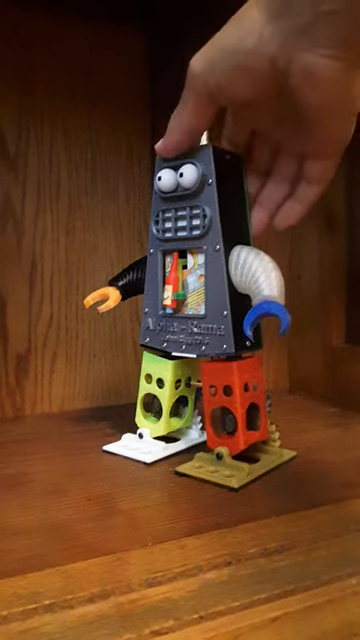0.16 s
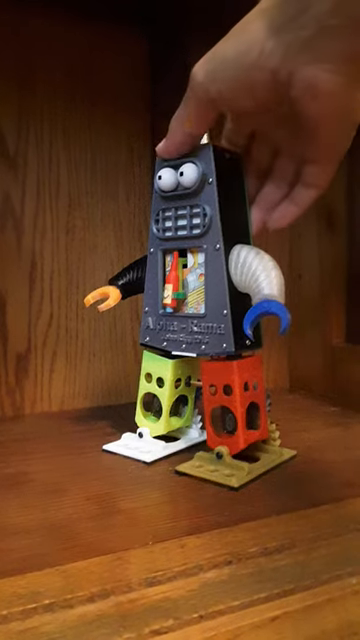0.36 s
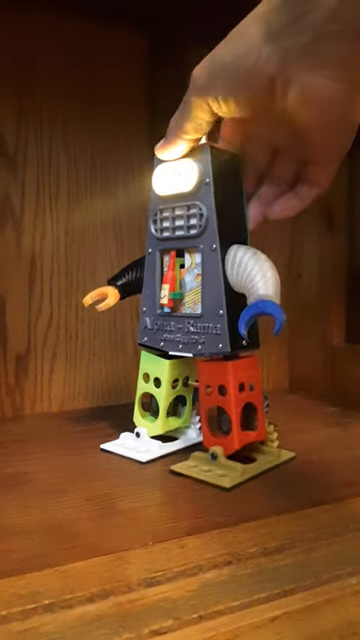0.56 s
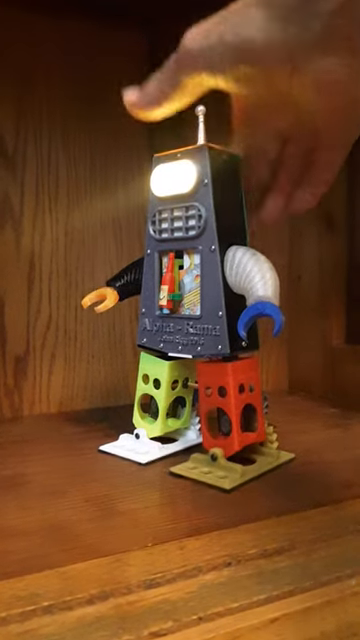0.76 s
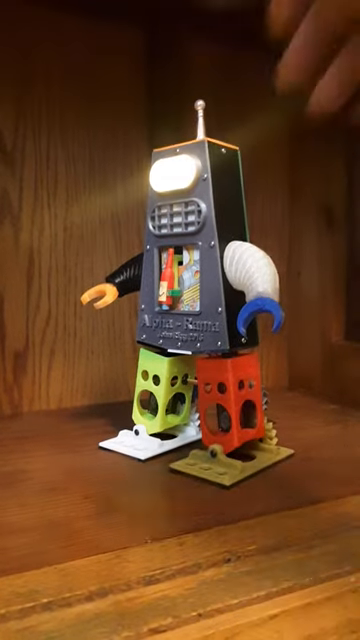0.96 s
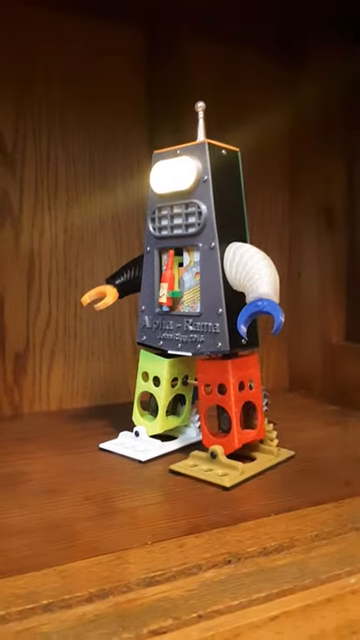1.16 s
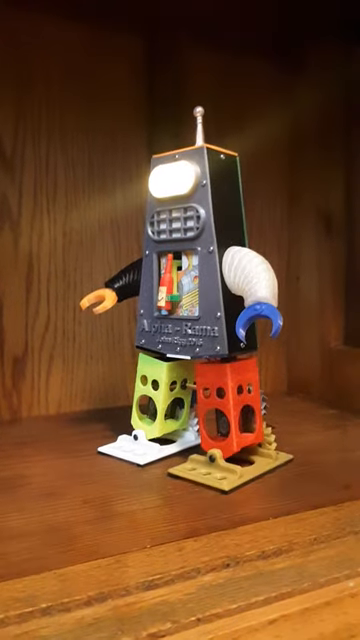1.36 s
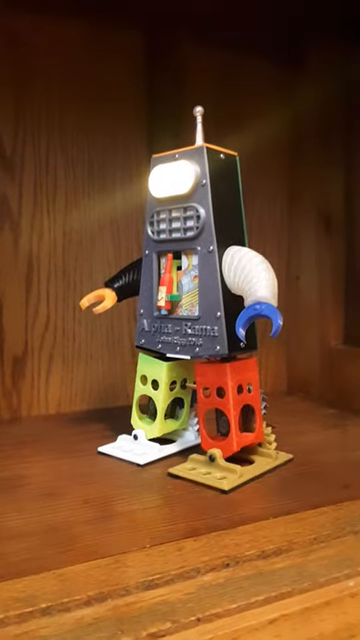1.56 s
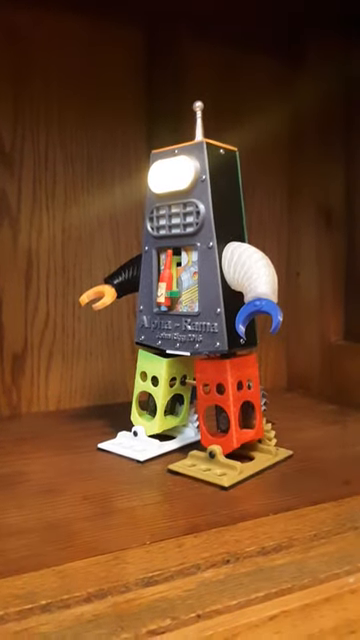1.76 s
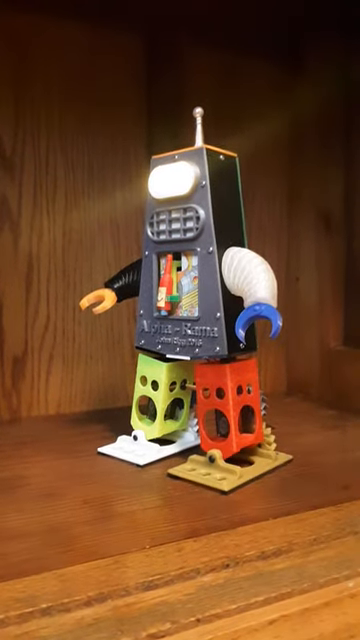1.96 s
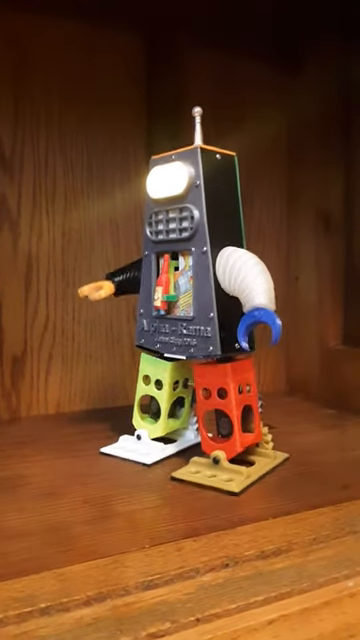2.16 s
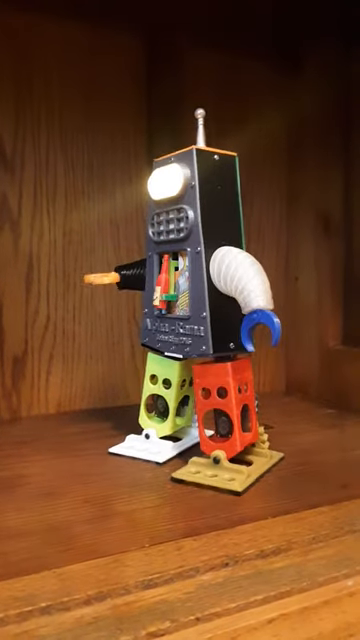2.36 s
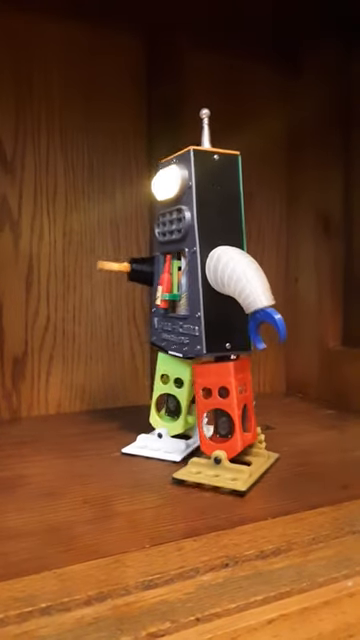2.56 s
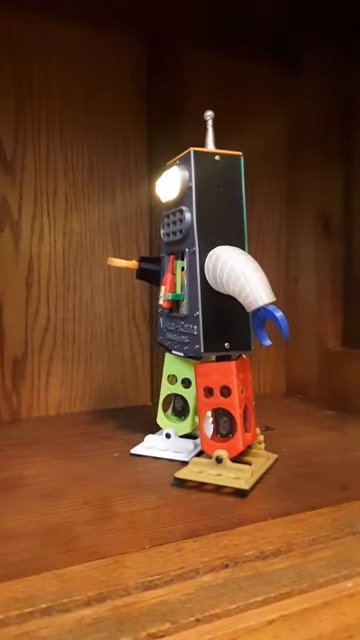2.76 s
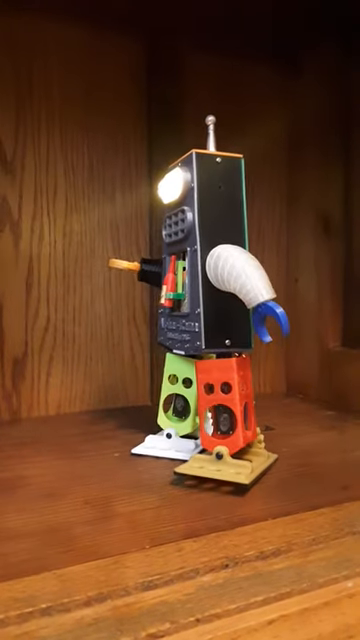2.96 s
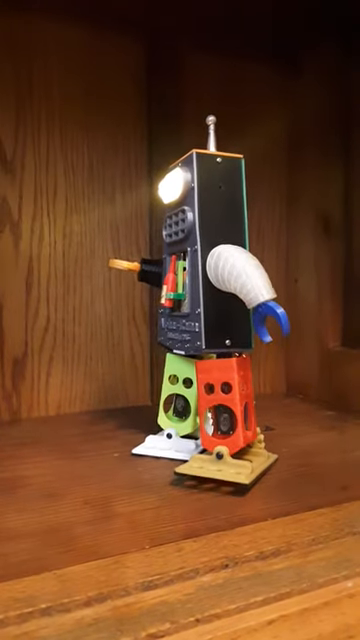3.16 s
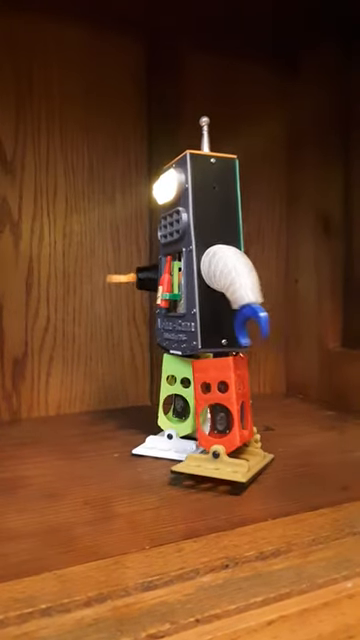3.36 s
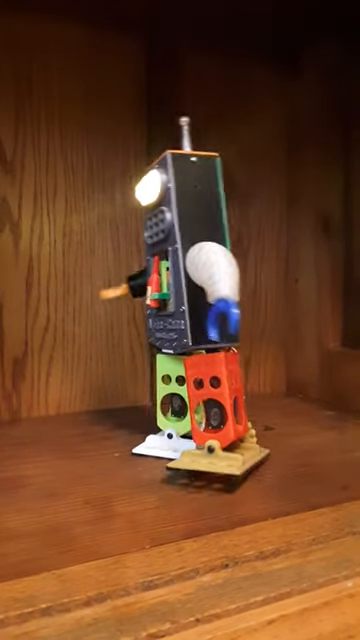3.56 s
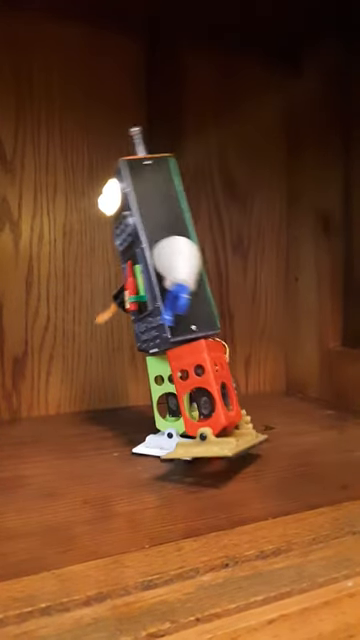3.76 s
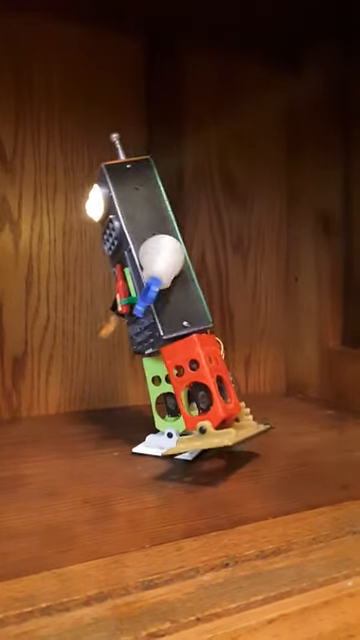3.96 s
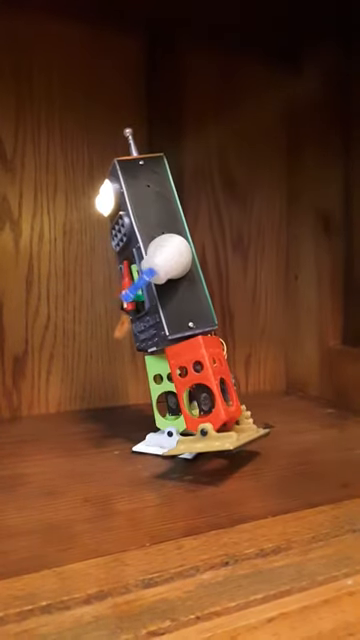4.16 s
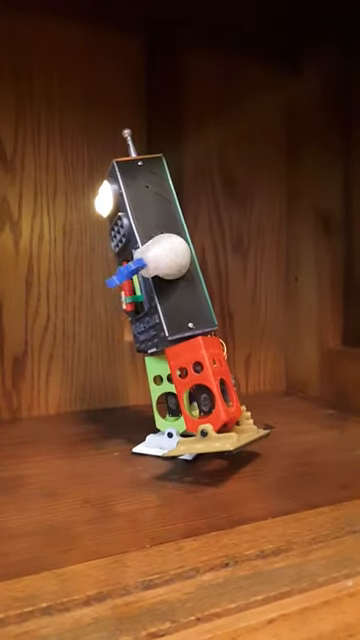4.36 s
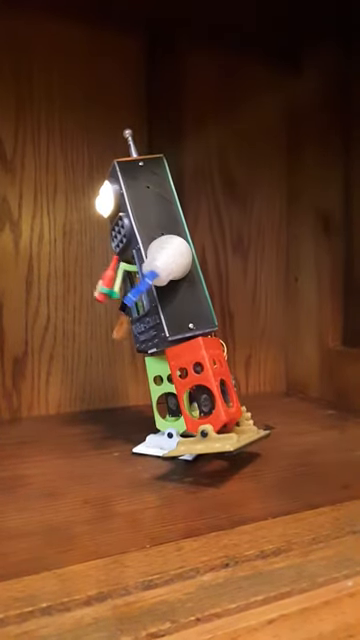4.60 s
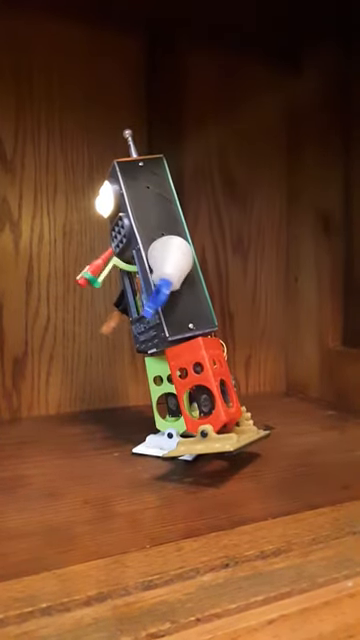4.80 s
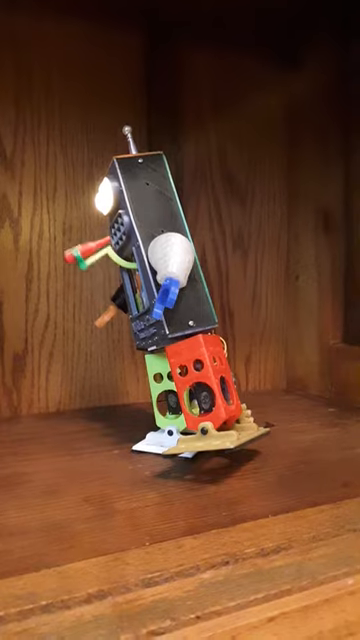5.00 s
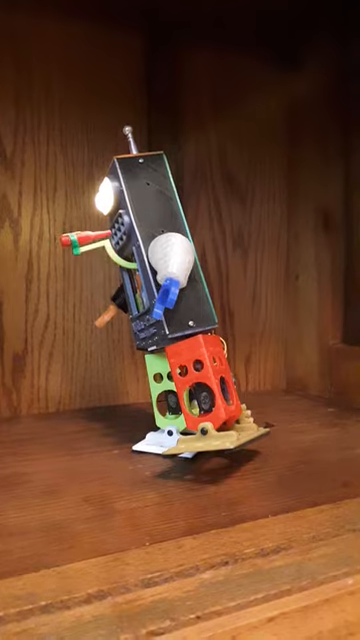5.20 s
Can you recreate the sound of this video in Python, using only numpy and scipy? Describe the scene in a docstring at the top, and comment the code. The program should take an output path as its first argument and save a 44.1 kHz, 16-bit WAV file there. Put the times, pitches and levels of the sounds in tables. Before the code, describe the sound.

A small toy robot snaps on, ticks quietly, then walks with rasping, ratcheting gears and light knocks on a wooden shelf.

```python
"""A tin and plastic toy robot ticks over in a wooden cabinet, close to a stereo phone, in a quiet room.
At half a second a switch snaps, the gears burst into a rasp and the feet knock on the shelf.
An idler gear whirs; from 2 s the gearbox grinds through a turn and coasts, from 3.2 s it ratchets
through a step and strains into a lean, and from 4.4 s it works the chest arm. All along, the teeth
ring the shell and throb once per shaft turn; under load the motor whines and drums the feet on the wood."""
import sys
import numpy as np
from scipy import signal
from scipy.fft import rfft, irfft
from scipy.io import wavfile

SR = 44100
rng = np.random.default_rng(int(sys.argv[2]) if len(sys.argv) > 2 else 0)


def inscribe(sig):
    """Save sig as 16-bit PCM at rate SR to the path in sys.argv[1].

    A 1-D sig is mono; a 2-D sig holds one channel per row.
    Samples are clipped to [-1, 1] before scaling.
    """
    pcm = np.round(np.clip(np.atleast_2d(sig).T, -1, 1) * 32767)
    wavfile.write(sys.argv[1], SR, pcm.astype(np.int16))


N = 230883
T = np.arange(N) / SR
GRIND_DB, RATCHET_DB, FREE_DB = 1, 7, 10  # throb per turn: a loaded mesh grinds, a free one ratchets


def amp(db):
    """Decibels to gain."""
    return 10 ** (np.asarray(db) / 20)


def unit(x):
    """Scale to rms 1."""
    return x / np.sqrt(np.mean(x ** 2))


def unit_energy(h):
    """Scale each channel of a response to energy 1."""
    return h / np.sqrt(np.sum(h ** 2, axis=-1, keepdims=True))


def pan(db):
    """Left and right gains for a level difference."""
    return amp(np.array([[db], [-db]]) / 2)


def decay(t, t60):
    """A fade that loses 60 dB in t60 seconds."""
    return np.exp(-np.log(1000) * t / t60)


def low_cut(x, hz):
    """Roll off the bass."""
    return signal.sosfilt(signal.butter(2, hz, "high", fs=SR, output="sos"), x)


def ring(x, response):
    """Pass a sound through a mono or stereo impulse response."""
    return signal.fftconvolve(np.atleast_2d(x), np.atleast_2d(response), axes=1)[:, :N]


def colour(points, peaks=(), size=4096):
    """Minimum-phase response of a (Hz, dB) outline with resonances on top."""
    f = np.arange(size // 2 + 1) * SR / size
    hz, db = np.transpose(points)
    db = np.interp(np.log(f + 1), np.log(hz), db)
    for centre, width, lift in peaks:
        db = db + lift / (1 + (2 * (f - centre) / width) ** 2)
    cepstrum = irfft(np.log(amp(db)))
    cepstrum[1:size // 2] *= 2
    cepstrum[size // 2 + 1:] = 0
    return irfft(np.exp(rfft(cepstrum)))[:size // 2]


def tail(t60, wide_hz=500, size=16384):
    """Dense dying reflections, centred in the bass and wide in the treble."""
    mid, side = rng.standard_normal((2, size))
    side = low_cut(side, wide_hz)
    return unit_energy(np.array([mid + side, mid - side]) * decay(np.arange(size) / SR, t60))


def walk(rate):
    """A random drift with a spread near 1 and `rate` new values a second."""
    knots = rng.standard_normal(2048)
    return np.interp(T * rate, np.arange(len(knots)), knots)


def impulses(rows):
    """A click for each (seconds, dB) row."""
    x = np.zeros(N)
    for s, db in rows:
        x[int(s * SR)] += amp(db)
    return x


def spells(rows):
    """Envelope of spells of work, each with an attack, a sloping hold and a release."""
    gain = 0
    for start, end, db, attack, sag, release in rows:
        rise = np.clip((T - start) / attack, 0, 1)
        hold = amp(db - sag * (np.clip(T, start, end) - start))
        gain = gain + rise * hold * decay(np.maximum(T - end, 0), release)
    return gain


def teeth(turns, per_s, throb_db, scatter_db, wander_db, limp_db=1):
    """Random tooth strikes that throb once per shaft turn; every other turn bites harder."""
    strikes = (rng.random(N) < per_s / SR) * rng.choice([-1, 1], N)
    size_db = scatter_db * np.clip(rng.standard_normal(N), -2, 2)
    load_db = throb_db * (1 - 2 * (turns % 1))
    load_db = load_db + limp_db * np.cos(np.pi * turns) + wander_db * walk(55)
    return unit(strikes * amp(size_db + load_db))


def shell(force, tone, direct_db=-2, cabinet_db=-6, shell_t60=0.048, cabinet_t60=0.25, contacts=4):
    """Each click lands on one of a few contact points, which ring shell and cabinet in their own way."""
    # The shell's sharp resonances. Each row: centre in Hz, width in Hz, lift in dB.
    resonances = [(1090, 50, 3), (1600, 90, 4), (1805, 60, 6), (2480, 70, 8), (3130, 70, 5), (3590, 100, 5),
                  (4270, 110, 3), (4510, 100, 4), (5650, 110, 3), (5950, 90, 4), (6250, 100, 5)]
    contact, sound = rng.integers(0, contacts, N), 0
    for k in range(contacts):
        space = tail(shell_t60) + amp(cabinet_db) * tail(cabinet_t60)
        space[0, 0] += amp(direct_db)
        space[1, 18] += amp(direct_db)  # the direct sound reaches the right side 18 samples later
        sound = sound + ring(force * (contact == k), unit_energy(space))
    response = low_cut(colour(tone, resonances), hz=230)  # so small a shell radiates no bass
    return ring(sound, unit_energy(response))


def room(air_db=-68, side_db=-7):
    """A bed of quiet room air and mains hum."""
    # The air's colour and the hum's partials. Each row: frequency in Hz, level in dB.
    air_tone = [(20, -29.5), (60, -0.5), (120, 6), (200, -8.5), (400, -16), (800, -23), (2000, -22.5),
                (8000, -31), (16000, -29.5)]
    partials = [(120, -70), (240, -79.5)]
    air = rng.standard_normal(N) + amp(side_db) * rng.standard_normal((2, N))
    hum = sum(amp(db) * np.sqrt(2) * np.sin(2 * np.pi * hz * T) for hz, db in partials)
    return unit(ring(air, colour(air_tone))) * amp(air_db + walk(3.3)) + hum


def motor_whine(turns):
    """The motor sings on wavering multiples of the shaft rate."""
    # The whine's partials. Each row: shaft multiple, relative level in dB.
    partials = [(2, -5), (11, -6), (12, -11.5), (13, -17), (14, -16), (15, -17)]
    # Its swells. Each row: start and end in seconds, level in dB, attack in seconds,
    # sag in dB per second, release t60 in seconds.
    swells = [(1.3, 2.7, -67, 1, 3.5, .4), (3.3, 3.7, -60, 0.34, -6, .8), (4.2, 5.24, -64, 0.17, 1, .2)]
    whine = sum(amp(db + 0.49 * walk(5.3)) * np.sin(2 * np.pi * (multiple * turns + rng.random()))
                for multiple, db in partials)
    return np.sqrt(2) * whine * spells(swells)


def drumming_feet(turns, slips_per_turn=4):
    """The motor shakes the feet against the board; a sole sticks and slips, never quite evenly."""
    # Spells of drumming and of sole judder. Each row: start and end in seconds, level in dB,
    # attack in seconds, sag in dB per second, release t60 in seconds.
    drum_spells = [(.49, .71, -49.5, .03, 38, 0.25), (2.01, 3.24, -53, 0.075, 11, .2),
                   (3.23, 3.72, -58.5, 0.05, -13, 0.16), (3.75, 5.24, -63.5, 0.046, 6.5, .2)]
    judder_spells = [(2.45, 3.08, -58.5, .12, 5, 0.37), (3.42, 3.5, -49.5, 0.022, -20, 0.13),
                     (3.525, 3.6, -38.5, 0.037, 0, 0.14)]
    # The drumming board's colour. Each row: frequency in Hz, level in dB.
    board_tone = [(20, -19.5), (70, -40.5), (100, 6.5), (125, -6.5), (148, 5), (175, -8.5), (205, 0),
                  (250, -1), (330, -7), (500, -17), (1000, -64)]
    shake = teeth(turns, per_s=990, throb_db=-1.5, scatter_db=0.5, wander_db=1.7)
    board = unit(ring(shake, colour(board_tone))) * spells(drum_spells)
    slips = slips_per_turn * turns + 0.21 * walk(25)
    judder = np.sqrt(2) * np.sin(2 * np.pi * slips) * amp(2 * walk(26)) * spells(judder_spells)
    return board + amp(-2.5) * ring(board, tail(0.18)) + judder


def hollow_body(attack_s=0.0046):
    """The air-filled body answers a soft thumb with a short note."""
    # The body's air modes. Each row: frequency in Hz, level in dB, t60 in seconds.
    modes = [(574, 1, 0.054), (906, -12, 0.063)]
    # The thumb presses and lets go. Each row: time in seconds, level in dB.
    touches = [(.245, -55.5), (.487, -29), (.704, -39)]
    t = np.arange(8192) / SR
    note = sum(amp(db) * np.sin(2 * np.pi * hz * t) * decay(t, t60) for hz, db, t60 in modes)
    return ring(impulses(touches), note * (1 - np.exp(-t / attack_s)))


def shelf_knocks(level_db=-3, thud_db=1, cabinet_db=-5, cabinet_t60=0.21):
    """Feet and body bump the shelf; a soft contact leaves only the low modes of the board."""
    # The bumps. Each row: time in seconds, relative level in dB, softness cut-off in Hz.
    bumps = [(.008, -22.5, 310), (0.521, -15.5, 444), (0.571, -12, 400), (0.596, -21, 300),
             (0.637, -18.5, 362), (0.828, -26, 587), (0.902, -14, 425), (1.285, -26, 497),
             (1.714, -21, 374), (2.041, -18.5, 513), (2.221, -15, 583), (2.811, 3.5, 75),
             (3.252, -14.5, 305), (3.602, -4.5, 1700), (3.671, -11.5, 281), (3.767, -5.5, 2370),
             (3.7711, 1, 1860)]
    # The board's modes. Each row: frequency in Hz, relative level in dB, t60 in seconds.
    modes = [(140.6, -2, 0.59), (200.4, -5.5, 0.35), (251.6, -18.5, 0.12), (433, 0.5, 0.17),
             (470, -3.5, 0.095), (582, -10.5, 0.25), (768, -15, .12), (1004, 0, 0.077), (1073, 1.5, 0.12),
             (1264, -19, 0.14), (1340, -10, 0.15), (1620, -8.5, .16), (1770, -5, .16), (1906, 1.5, 0.11),
             (2908, 10, 0.12)]
    # The dull thud of a contact. Each row: frequency in Hz, level in dB.
    thud_tone = [(25, -23.5), (60, -10), (100, -5), (160, 9), (400, 0.5), (900, -5), (1800, 1), (2500, -14),
                 (8000, -35.5)]
    force = 0
    for s, db, hz in bumps:
        softness = signal.butter(4, hz, fs=SR, output="sos")
        force = force + signal.sosfilt(softness, impulses([(s, db)]) + 1e-18)
    force = low_cut(force, hz=95)  # the deepest bass of each bump is rolled off
    t = np.arange(16384) / SR
    wood = sum(amp(db) * np.cos(2 * np.pi * hz * t) * decay(t, t60) for hz, db, t60 in modes)
    thud = amp(thud_db) * ring(force, unit_energy(colour(thud_tone)))
    board = ring(force, unit_energy(wood)) + thud
    return amp(level_db) * (board + amp(cabinet_db) * ring(board, tail(cabinet_t60)))


def idling_gears(turns, idle_db=-70, end_s=2.02, rub_attack_s=0.021, rub_release_s=0.13):
    """Light ticking until the turn begins, louder where a wheel rubs or a tooth catches."""
    # A wheel rubs. Each row: start and end in seconds, level in dB.
    rubs = [(0, 0.066, -58.5), (0.093, .19, -69.5), (.36, 0.49, -66.5), (.9, 0.976, -60),
            (1.212, 1.304, -70.5), (1.676, 1.773, -67.5)]
    # Single teeth catch and let go. Each row: time in seconds, level in dB.
    catches = [(.349, -36), (.427, -31), (.905, -30), (.9765, -28), (1.683, -42), (1.794, -33.5),
               (1.891, -38)]
    # The ticking's colour. Each row: frequency in Hz, level in dB.
    tone = [(500, -10), (1000, -18.5), (1400, -18), (1850, -4.5), (2400, -27.5), (3200, -8), (4200, -13),
            (5000, 3.5), (5900, 3), (6600, -4), (7600, -17.5), (10000, -11.5), (14000, -5), (16000, -14.5)]
    rubbing = spells((start, end, db, rub_attack_s, 0, rub_release_s) for start, end, db in rubs)
    level = amp(idle_db) * (T < end_s) + rubbing
    ticks = teeth(turns, per_s=1200, throb_db=RATCHET_DB, scatter_db=3, wander_db=1.4) * level
    return pan(-3) * shell(ticks + impulses(catches), tone, shell_t60=0.0081, cabinet_db=-5)


def idler_whir(turns):
    """An idler gear whirs faintly on the right flank."""
    # Its run. Each row: start and end in seconds, level in dB, attack in seconds,
    # sag in dB per second, release t60 in seconds.
    run = [(1.15, 2.01, -69.5, 0.29, 2, .1)]
    # Its colour. Each row: frequency in Hz, level in dB.
    tone = [(500, -2.5), (1100, -14), (1550, -7), (1900, -2.5), (2400, -19), (3600, -9), (4000, -3),
            (4250, 3), (4600, -9), (5300, -14), (5900, 1), (6500, -17), (7600, -22), (16000, -17)]
    whir = teeth(turns, per_s=1200, throb_db=RATCHET_DB, scatter_db=4, wander_db=1) * spells(run)
    return pan(-9) * shell(whir, tone)


def loose_joint():
    """A loose joint clacks against the shell on the right flank."""
    # The clacks. Each row: time in seconds, level in dB.
    clacks = [(.552, -7), (.559, -18.5), (1.532, -28)]
    # Their colour. Each row: frequency in Hz, level in dB.
    tone = [(500, -34), (1100, -10.5), (1400, 7), (1900, -1), (2500, -12), (4200, -10), (7000, -42),
            (16000, -37)]
    return pan(-9) * shell(impulses(clacks), tone)


def switch_snap():
    """The switch snaps over and its spring bounces."""
    # Snap and bounces. Each row: time in seconds, level in dB.
    clicks = [(.4865, 0), (.4878, 4.5), (.4915, -5.5), (.5065, -4), (.516, -20.5)]
    # Their bright colour. Each row: frequency in Hz, level in dB.
    tone = [(400, -8), (800, -39), (1800, -5), (2300, -24), (3400, 0.5), (4800, 7.5), (6300, -3),
            (7600, -12), (10000, -9), (14000, -1), (16000, -18)]
    return shell(impulses(clicks), tone, shell_t60=0.04, cabinet_t60=0.13)


def snagging(width_s=0.016):
    """Gain of the loaded gears: a dip just before each snagged tooth gives way, a surge just after."""
    # The snags. Each row: time in seconds, depth in dB.
    snags = [(2.159, 2), (3.787, 3), (3.915, 1), (4.026, 4.5), (4.304, 3.5), (4.527, 1), (4.75, 0),
             (4.868, 3), (4.975, 0), (5.073, 2.5), (5.167, 4.5)]
    lags = [((T - s) / width_s, db) for s, db in snags]
    return amp(sum(db * lag * np.exp((1 - lag ** 2) / 2) for lag, db in lags))


def gear_trains(turns):
    """The gear trains take the load in turn and ring the shell, each with its own throb and colour."""
    # When the gears start up, turn the robot, coast, step, strain into the lean and work the arm.
    # Each row: start and end in seconds, level in dB, attack in seconds, sag in dB per second,
    # release t60 in seconds.
    start_spells = [(.486, .56, -28, .002, 32, 0.11)]
    turn_spells = [(2.003, 2.68, -36, 0.056, -1.1, 0.23)]
    coast_spells = [(.6, .73, -53.5, 0.059, 4.1, 0.23), (2.69, 3.21, -47, 0.024, 16.5, .1)]
    step_spells = [(3.201, 3.69, -36.5, 0.023, 0.89, 0.56), (3.73, 4.41, -40.5, .05, 0, .15)]
    strain_spells = [(3.78, 4.39, -37.5, 0.19, -1.6, 0.14)]
    arm_spells = [(4.426, 5.186, -33.5, 0.0077, 2.84, 0.043)]
    # The colour of each move. Each row: frequency in Hz, level in dB.
    start_tone = [(240, -47), (400, -36), (553, -12), (752, -34), (947, -19), (1050, -19.5), (1780, -18),
                  (2490, -19), (2610, -16), (6090, -8.5), (7790, -23), (14600, -23), (15800, -30)]
    turn_tone = [(300, -23), (500, -23), (780, -31), (1150, -13), (1400, -19), (1880, -3), (2180, -14),
                 (3000, -7.5), (4000, -3), (5100, -5.5), (6000, -3), (7400, -16.5), (12000, -17),
                 (16000, -22)]
    coast_tone = [(300, -18.5), (800, -17.5), (1300, -10), (1850, 1.5), (2200, -10.5), (2600, -2),
                  (3100, -5.5), (3750, 6), (4400, -2), (5200, -2), (6000, -1), (7400, -19), (10000, -14),
                  (16000, -27.5)]
    step_tone = [(300, -13.5), (550, -24.5), (780, -29), (1200, -12.5), (1850, -6), (2200, -11.5),
                 (3000, -8.5), (3600, -2), (4400, 0), (5100, -2.5), (5900, 0.5), (7400, -17),
                 (11000, -16.5), (16000, -24)]
    strain_tone = [(500, -39), (1900, -16.5), (2800, -13.5), (3500, 3.5), (3900, -2), (4250, 5), (4600, 5),
                   (5100, -10), (5650, 3.5), (6500, -19.5), (16000, -44)]
    arm_tone = [(300, -25.5), (550, -21), (880, -23.5), (1200, -11.5), (1680, -4.5), (2080, -9.5),
                (2450, -6), (3150, -3.5), (4500, 0.5), (5200, -2), (6250, -1), (7400, -16.5), (12000, -14),
                (16000, -31)]
    start = teeth(turns, per_s=3000, throb_db=GRIND_DB, scatter_db=2, wander_db=5.5)
    turn = teeth(turns, per_s=1700, throb_db=GRIND_DB, scatter_db=1, wander_db=0.8)
    coast = teeth(turns, per_s=2000, throb_db=FREE_DB, scatter_db=6.5, wander_db=1.1)
    step = teeth(turns, per_s=3000, throb_db=RATCHET_DB, scatter_db=0.5, wander_db=1)
    strain = teeth(turns, per_s=2200, throb_db=4, scatter_db=0, wander_db=3.7)
    arm = teeth(turns, per_s=1800, throb_db=4.5, scatter_db=-0.5, wander_db=1.3)
    load = snagging()
    return (shell(start * spells(start_spells), start_tone)
            + shell(turn * spells(turn_spells) * load, turn_tone)
            + shell(coast * spells(coast_spells), coast_tone, shell_t60=0.018, cabinet_db=0.5)
            + shell(step * spells(step_spells) * load, step_tone)
            + shell(strain * spells(strain_spells) * load, strain_tone)
            + shell(arm * spells(arm_spells) * load, arm_tone))


def scene():
    """One shaft paces gears, whine and drumming; each microphone hears the toy in its own colour."""
    # The shaft's speed. Each row: time in seconds, turns per second.
    shaft_speed = [(0, 51.6), (1, 50), (2, 50), (2.35, 48.3), (2.7, 50), (3.05, 50), (3.15, 54.3),
                   (3.25, 50), (3.7, 50), (4.2, 49.7), (4.9, 50)]
    # The stereo balance. Each row: frequency in Hz, left minus right in dB.
    balance = [(100, -0.5), (300, -2.5), (600, -1), (1000, 0), (1500, -6.5), (2100, -5.5), (2600, 1.5),
               (3800, -5), (4800, 0.5), (6100, -7.5), (7200, 1.5), (8500, 10.5), (12000, -2.5), (15000, 5)]
    turns = np.cumsum(np.interp(T, *np.transpose(shaft_speed))) / SR
    toy = motor_whine(turns) + drumming_feet(turns) + hollow_body() + shelf_knocks()
    toy += idling_gears(turns) + idler_whir(turns) + loose_joint() + switch_snap() + gear_trains(turns)
    microphones = [colour([(hz, side * db / 2) for hz, db in balance]) for side in (1, -1)]
    return room() + ring(toy, np.array(microphones))


def record(dry, top_hz=15800):
    """The phone cuts the top treble steeply."""
    return signal.sosfilt(signal.ellip(10, .2, 80, top_hz, fs=SR, output="sos"), dry)


dry = scene()
out = record(dry)
inscribe(out)
```